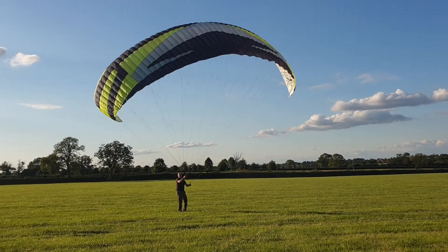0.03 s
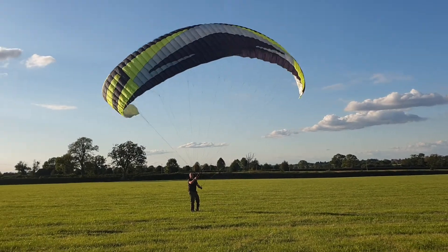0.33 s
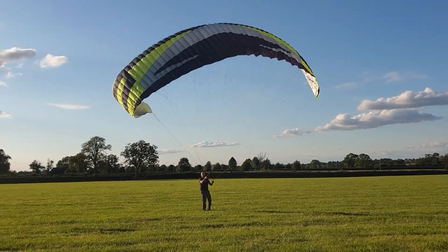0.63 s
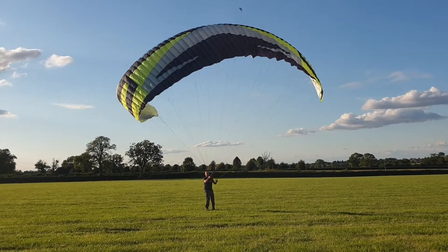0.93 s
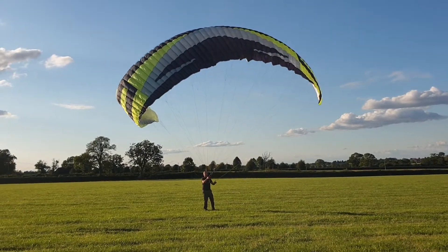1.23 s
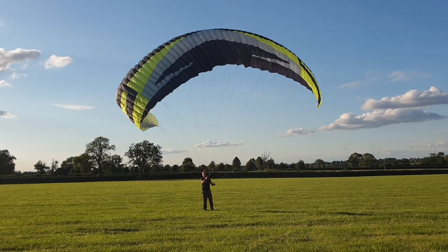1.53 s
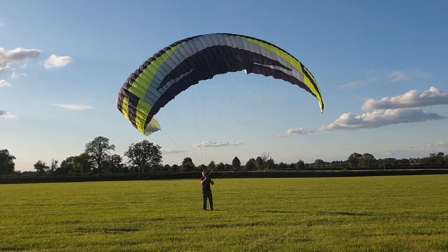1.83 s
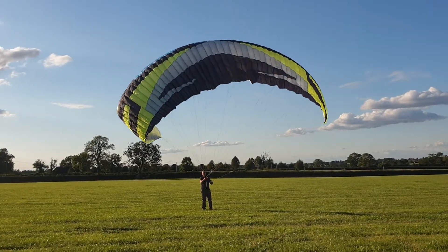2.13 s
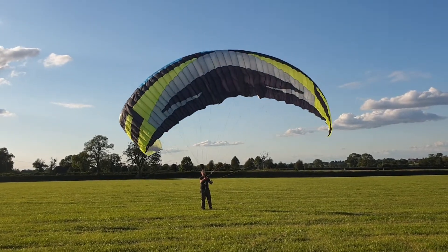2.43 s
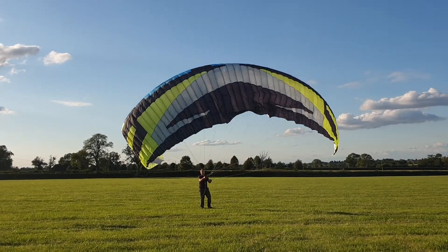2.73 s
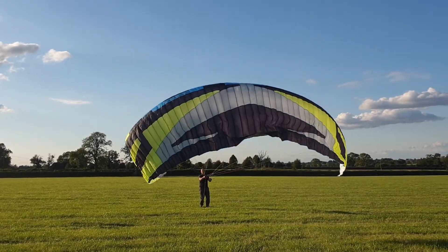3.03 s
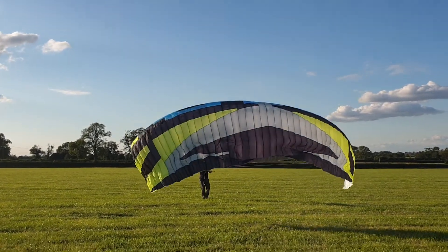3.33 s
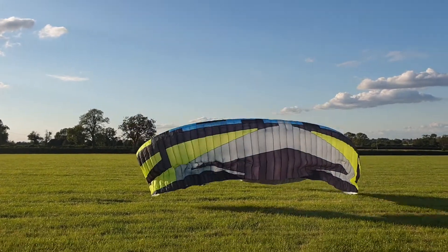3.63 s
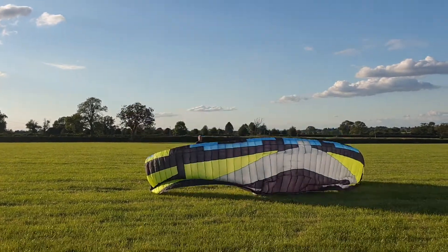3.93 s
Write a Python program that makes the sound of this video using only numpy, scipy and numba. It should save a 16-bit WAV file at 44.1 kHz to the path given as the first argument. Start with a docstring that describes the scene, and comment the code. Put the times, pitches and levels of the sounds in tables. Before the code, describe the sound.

A paraglider wing rustles in a light breeze outdoors while gusts rumble and thump on the nearby microphone. Its lines sing faintly and tick, the airy rush grows, and the fabric flaps softly before sweeping over the grass.

```python
"""A paraglider wing sinks onto an open field, close to a microphone in a light breeze.
From the start grass hisses, eddies buffet the two microphone ports, and faint air rushes over the
crinkling cloth and sings in the lines. Around 2 s the rigging ticks. From 2.6 s the rush swells and
the lines rise in pitch; after 3.1 s they slacken and the canopy flaps softly.
At 3.9 s the cloth sweeps onto the grass."""
import sys
import numpy as np
from scipy import signal
from scipy.fft import rfft, irfft
from scipy.io import wavfile
from scipy.ndimage import map_coordinates
from numba import njit

SR = 44100
rng = np.random.default_rng(int(sys.argv[2]) if len(sys.argv) > 2 else 0)


def file_out(sig):
    """Save sig as 16-bit WAV at sys.argv[1]."""
    # one column per channel
    cols = np.atleast_2d(sig).T
    # limit, then scale
    lim = np.clip(cols, -1, 1)
    pcm = np.round(lim * 32767).astype(np.int16)
    wavfile.write(sys.argv[1], SR, pcm)


N = 176400
TIME, FREQS = np.arange(N) / SR, np.fft.rfftfreq(N, 1 / SR)
SIDES = np.array([[1], [-1]])  # left, right


def undb(db):
    """Decibels to gain."""
    return 10 ** (np.asarray(db) / 20)


def unit(x):
    """Scale to rms 1."""
    return x / np.sqrt(np.mean(x ** 2))


def curve(rows):
    """Automation: straight lines through (t/s, value) rows."""
    return np.interp(TIME, *np.array(rows).T)


def spectrum(rows):
    """Join (f/Hz, value) rows on a log-frequency axis."""
    hz, values = np.array(rows, float).T
    return np.interp(np.log(np.maximum(FREQS, 1)), np.log(hz), values)


def eq(x, rows):
    """Shape a sound with (f/Hz, level/dB) rows."""
    return irfft(rfft(x) * undb(spectrum(rows)), N)


def pan(left_db):
    """Stereo gains with the left louder by left_db."""
    return undb(SIDES * left_db / 2)


def wander(rate_hz):
    """Smooth random modulation of rms 1."""
    return unit(irfft(rfft(rng.standard_normal(N)) * np.exp(-(FREQS / rate_hz) ** 2) * (FREQS > 0), N))


def stereo_noise(correlation):
    """White noise with a left-right correlation, overall or per frequency."""
    mid, side = rfft(rng.standard_normal((2, N)))
    return irfft(mid * np.sqrt((1 + correlation) / 2) + SIDES * side * np.sqrt((1 - correlation) / 2), N)


def flicker(x, depth_db, rate_hz, bands=12):
    """Let overlapping bands waver in level, each on its own."""
    place = np.interp(np.log(FREQS + 1), np.log([300, 15000]), [0, bands - 1])
    bins = rfft(x)
    return sum(irfft(bins * np.maximum(1 - abs(place - k), 0), N) * undb(depth_db * wander(rate_hz))
               for k in range(bands))


@njit
def bandpass(x, hz, width_hz):
    """State-variable band-pass with a moving centre."""
    y, band_state, low_state = np.empty(len(x)), 0., 0.
    for i in range(len(x)):
        g, damping = np.tan(np.pi * hz[i] / SR), width_hz / hz[i]
        band = (band_state + g * (x[i] - low_state)) / (1 + g * (g + damping))
        band_state = 2 * band - band_state
        low_state += 2 * g * band
        y[i] = damping * band
    return y


def noise_band(hz, width_hz, correlation):
    """A steep-sided stereo band of turbulence."""
    hz, stage_width = hz * np.ones(N), 2. * width_hz
    return unit(np.array([bandpass(bandpass(x, hz, stage_width), hz, stage_width)
                          for x in stereo_noise(correlation)]))


def puffs(rows):
    """Bell-shaped swells of band noise, wider in stereo when high."""
    return sum(noise_band(hz, width_hz, correlation=.4 * min(1, 1500 / hz))
               * undb(db) * np.exp(-.5 * ((TIME - when) / width_s) ** 2)
               for when, hz, width_hz, width_s, db in rows)


def crackle(per_s, tone, spread_db=5, decay_s=.0025):
    """Tiny noise snaps of uneven size at random times."""
    hits = (rng.random(N) < per_s / SR) * undb(spread_db * np.minimum(rng.exponential(size=N), 4))
    envelope = signal.lfilter([1], [1, -np.exp(-1 / (decay_s * SR))], hits)
    return unit(eq(envelope * rng.standard_normal((2, N)), tone))


# stereo image of rushing air at full focus: f/Hz, left-right correlation
AIR_IMAGE = [(300, 0.81), (650, 0.96), (1200, .85), (2400, 0.5), (3100, 0.83), (4200, -0.15),
             (15000, -0.33)]
def air_noise(focus):
    """Air noise at the two ports: centred lows, wide highs; less focus makes it more diffuse."""
    return stereo_noise(focus * spectrum(AIR_IMAGE))


# tone of the grass: f/Hz, left level/dB, right level/dB
GRASS_EQ = [(146, 8.5, -25), (467, -9, -5), (930, -3, -5.5), (1150, -3, -2.5), (1600, -10, -1),
            (2180, -7.5, -15), (2600, -7.5, -25), (3480, -8, -24), (3820, -3.5, 3), (4560, 2, -12.5),
            (4950, -0.5, -21), (5720, 3, 0.5), (6530, 3.5, 1), (7650, 0.5, -12), (8200, -64, -50),
            (10300, -16, -15), (12900, -8.5, -50), (15400, -8.5, -12)]
def grass_hiss():
    """Breeze in the grass lays a shimmering bed of hiss all round."""
    rows, air = np.array(GRASS_EQ), air_noise(focus=.5)
    hiss = unit(np.array([eq(air[c], rows[:, [0, c + 1]]) for c in range(2)]))
    return flicker(hiss, depth_db=2, rate_hz=18) * undb(-64.5)


# fader of the fine hiss: t/s, level/dB
FINE_FADER = [(0, -82.5), (.6, -74.5), (.8, -90), (1.0, -75.5), (1.35, -82.5), (1.45, -73.5), (1.8, -71.5),
              (2.05, -72.5), (2.35, -70.5), (2.5, -68), (4.0, -63)]
# its tone: f/Hz, level/dB
FINE_EQ = [(3000, -24), (6500, 12), (8500, -2), (10000, 6.5), (14000, 3), (15500, -2)]
def fine_hiss():
    """A finer, ticking hiss comes and goes on the left."""
    hiss = unit(eq(stereo_noise(0), FINE_EQ))
    ticks = crackle(per_s=130, tone=FINE_EQ) * undb(-6)
    return (hiss + ticks) * undb(curve(FINE_FADER) + 1.3 * wander(11)) * pan(left_db=10)


# fader of the wind on the ports: t/s, level/dB
WIND_FADER = [(0, -51), (.26, -49.5), (.32, -65), (.37, -54.5), (.55, -49.5), (.67, -60.5), (.78, -48.5),
              (1.1, -50), (1.42, -52.5), (1.55, -59.5), (1.68, -50.5), (1.85, -48.5), (2.3, -52.5),
              (2.55, -41), (2.85, -42.5), (3.1, -43.5), (3.45, -39), (3.6, -36), (3.68, -44), (3.78, -36),
              (4.0, -39.5)]
# its tone: f/Hz, level/dB
WIND_EQ = [(15, -29), (30, -3.5), (58, 0.5), (100, -0.5), (160, -13.5), (260, -20), (400, -31),
           (600, -42.5), (1500, -65)]
def port_wind(depth_db=5, brighten=.22):
    """Eddies rumble at each port on its own; the stronger ones are brighter."""
    ports = []
    for noise in stereo_noise(0):
        rumble = unit(eq(noise, WIND_EQ))
        low = signal.sosfiltfilt(signal.butter(2, 150, fs=SR, output="sos"), rumble)
        eddy_db = depth_db * unit(np.minimum(wander(23.7), .9))
        ports.append(unit(low * undb(eddy_db) + (rumble - low) * undb(eddy_db * (1 + brighten))))
    return np.array(ports) * undb(curve(WIND_FADER))


# lag of the ground reflection, shortening as the wing sinks: t/s, delay/ms
BOUNCE_DELAY = [(0, 1.68), (1.5, 1.87), (2.6, 1.7), (3.2, 1.66), (3.8, 1.55), (4.0, 1.54)]
# tone of the reflection: f/Hz, level/dB
BOUNCE_EQ = [(500, -1), (1700, -15.5), (3500, -5.5), (7000, -12.5)]
# tone of air on the cloth: f/Hz, level/dB
CLOTH_EQ = [(200, -27), (520, -7.5), (780, 3), (1000, -1), (1450, 0.5), (1900, 2), (2500, -4.5),
            (2780, -6.5), (3100, -1.5), (3600, 0), (5200, -4), (6900, -2), (8500, -17), (11500, -9.5),
            (15500, -11.5)]
def cloth_rush():
    """Air rushes over the cloth; a dull reflection off the ground hollows it with a moving comb."""
    direct = flicker(eq(air_noise(focus=1), CLOTH_EQ), depth_db=1.8, rate_hz=23, bands=24)
    delayed = np.arange(N) - curve(BOUNCE_DELAY) * SR / 1000
    bounce = np.array([map_coordinates(c, [delayed], mode="mirror") for c in eq(direct, BOUNCE_EQ)])
    return unit(direct + bounce)


# airspeed over the lines: t/s, relative speed
AIRSPEED = [(0, 1.02), (1.4, 1.03), (2.6, 1.04), (3.2, 1.2), (3.8, 1.15), (4.0, 1.21)]
# voices of lines of different thickness: f/Hz at speed 1, bandwidth/Hz, relative level/dB
LINE_VOICES = [(1090, 84, -21), (1633, 145, -12), (3720, 390, -12)]
def singing_lines(drift=.012, flicker_db=1.8, slack_s=3.13, slack_db=-5.5):
    """The lines shed vortices at a pitch that follows airspeed, and sing less once slack."""
    speed, voices = curve(AIRSPEED), 0
    for hz, width_hz, db in LINE_VOICES:
        pitch = hz * speed * (1 + drift * wander(2.8))
        voices += noise_band(pitch, width_hz, correlation=.4) * undb(db + flicker_db * wander(12))
    return voices * undb(curve([(slack_s, 0), (slack_s + .2, slack_db)]))


# tone of the creases: f/Hz, level/dB
CRINKLE_EQ = [(1000, -18), (3500, 6.5), (6500, 3.5), (8500, -17), (11500, -1.5), (15500, -9.5)]
def crinkle():
    """Creases in the fabric snap in a dense crackle."""
    return crackle(per_s=380, tone=CRINKLE_EQ) * undb(-5.5)


# group fader of the wing: t/s, level/dB
WING_FADER = [(0, -66.5), (.3, -72), (1.3, -75.5), (1.7, -69), (2.3, -69.5), (2.7, -61), (3.05, -58),
              (3.2, -51.5), (3.45, -48), (3.9, -46.5), (3.95, -43.5), (4.0, -44)]
def wing(flutter_db=.7):
    """Cloth, lines and creases flutter together and swell as the wing comes down."""
    fader_db = curve(WING_FADER)
    line_lift = undb(.17 * (fader_db.max() - fader_db))  # the lines stand out while the rush is quiet
    mix = cloth_rush() + singing_lines() * line_lift + crinkle()
    return mix * undb(fader_db + flutter_db * wander(38)) * pan(left_db=.5)


# swish cues: t/s, f/Hz, bandwidth/Hz, width/s, level/dB
SWISH_CUES = [(.08, 1280, 347, 0.064, -69), (.09, 4300, 500, 0.13, -70), (.85, 1080, 150, 0.05, -72.5),
              (1.17, 2100, 130, 0.042, -76), (1.67, 3750, 600, 0.068, -68.5), (1.78, 5900, 900, 0.028, -65)]
def line_swishes():
    """Air swishes briefly through the lines."""
    return puffs(SWISH_CUES)


# buffet cues: t/s, level/dB, left minus right/dB, width/s, grit against the swing/dB
BUFFET_CUES = [(0.107, -34, -5, 0.0082, -41), (0.753, -45.5, -2, 0.034, -6.5), (0.803, -37, 9, 0.0034, -11),
               (1.234, -32.5, -1, 0.011, -17), (1.302, -36, 3, 0.012, -19), (1.419, -39, 6, 0.014, -19),
               (1.754, -34, 4, 0.0085, -13), (1.792, -31, -3, 0.0069, -12.5), (1.886, -36.5, 1, 0.013, -9),
               (1.918, -32, 0, 0.0099, -14.5), (2.001, -34, -5, 0.0056, -16.5), (2.13, -30, -5, 0.01, -18),
               (2.238, -31, 0.5, 0.0075, -24.5), (2.411, -33.5, -3, 0.012, -22.5),
               (2.491, -28, 5, 0.0044, -21), (2.516, -27, 1.5, 0.016, -21), (2.584, -39, 9, 0.0076, -9.5),
               (2.728, -31, 4, 0.0028, -14), (2.81, -30, 2.5, 0.011, -10.5), (2.913, -42, 2.5, 0.079, -6.5),
               (3.066, -33, 10.5, 0.0033, -13), (3.229, -31, -5, 0.0091, -13),
               (3.302, -32, -3.5, 0.014, -7.5), (3.472, -38.5, -2.5, 0.084, -2),
               (3.592, -26.5, 5.5, 0.014, -14), (3.726, -28.5, -2.5, 0.0054, -9),
               (3.75, -26, 1, 0.009, -14), (3.831, -35, 13, 0.037, -14), (3.973, -33.5, 4.5, 0.0016, 0.5)]
# tone of the grit: f/Hz, level/dB
GRIT_EQ = [(60, -17), (125, 6.5), (200, -3.5), (290, -11), (400, -15.5), (550, -35.5), (1500, -52)]
def buffets(centre_hz=60.6, scatter=.303):
    """Large eddies swing the pressure at both ports in low thumps, with gritty turbulence inside."""
    out = np.zeros((2, N))
    grit = unit(eq(stereo_noise(0), GRIT_EQ))
    for when, db, left_db, width_s, grit_db in BUFFET_CUES:
        detune, phase, skew = rng.standard_normal(3)
        near = abs(TIME - when) < 4 * width_s
        age = TIME[near] - when
        hz = centre_hz * (1 + scatter * np.tanh(detune))
        swing = np.sin(2 * np.pi * (hz * age + phase + .23 * np.tanh(skew) * SIDES))
        envelope = np.exp(-.5 * (age / width_s) ** 2) * undb(db)
        out[:, near] += (swing + grit[:, near] * undb(grit_db)) * envelope * pan(left_db)
    return out


# tick cues: t/s, f/Hz, bandwidth/Hz, level/dB
TICK_CUES = [(1.827, 12000, 3000, -61), (2.134, 6150, 600, -46), (2.429, 12500, 2500, -60)]
def rigging_ticks(attack_s=.001, decay_s=.0028):
    """The rigging gives a few sharp, bright ticks on the left."""
    ticks = 0
    for when, hz, width_hz, db in TICK_CUES:
        envelope = np.exp(-np.maximum((when - TIME) / attack_s, (TIME - when) / decay_s))
        ticks += noise_band(hz, width_hz, correlation=.21) * undb(db) * envelope
    return ticks * pan(left_db=9)


# flap cues: t/s, f/Hz, bandwidth/Hz, width/s, level/dB
FLAP_CUES = [(3.296, 327, 118, 0.0062, -49.5), (3.478, 235, 100, 0.0063, -45.5),
             (3.725, 220, 79, 0.008, -53), (3.826, 380, 131, 0.0065, -45.5)]
def canopy_flaps():
    """The slackening canopy flaps in soft, low puffs."""
    return puffs(FLAP_CUES)


# tone of cloth on grass: f/Hz, level/dB
SWEEP_EQ = [(500, -19), (1000, -14), (1300, 3.5), (1480, 2), (1700, -10), (2120, 6), (2500, -6.5),
            (3150, -2), (4000, -9), (5000, 0), (6500, -18), (8500, -40), (11500, -12.5), (15500, -21)]
def touchdown(start_s=3.922, attack_s=.03):
    """The cloth meets the grass and sweeps over it in a sudden broad swish."""
    sweep = flicker(eq(stereo_noise(.88), SWEEP_EQ), depth_db=1.8, rate_hz=21)
    attack = np.clip((TIME - start_s) / attack_s, 0, 1)
    return unit(sweep) * attack * undb(-44)


def scene():
    """The landing wing over a bed of grass and wind, with no reverb in the open."""
    bed = grass_hiss() + fine_hiss() + port_wind()
    return bed + wing() + line_swishes() + buffets() + rigging_ticks() + canopy_flaps() + touchdown()


def record(dry):
    """A gentle low cut thins the deepest rumble; a steep high cut takes off the top."""
    thinned = signal.sosfilt(signal.butter(1, 22, "high", fs=SR, output="sos"), dry)
    return signal.sosfilt(signal.ellip(12, .1, 90, 15750, fs=SR, output="sos"), thinned)


dry = scene()
out = record(dry)
file_out(out)
```